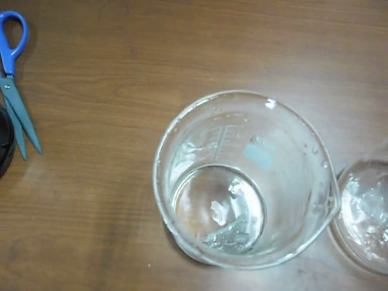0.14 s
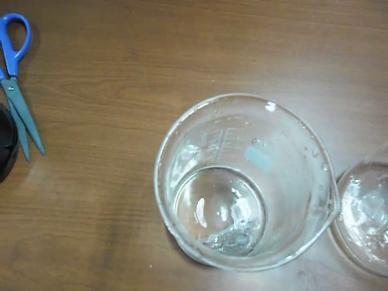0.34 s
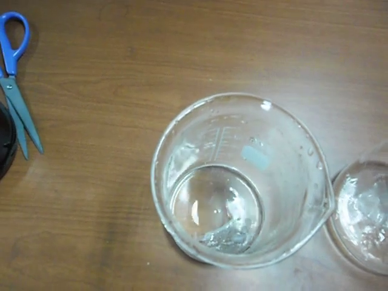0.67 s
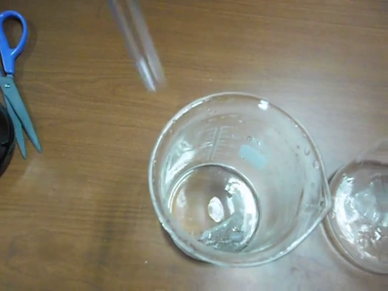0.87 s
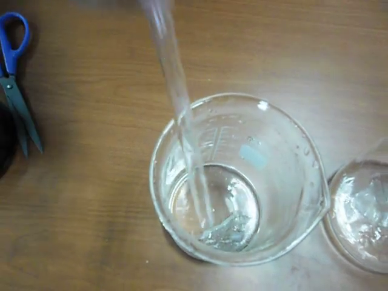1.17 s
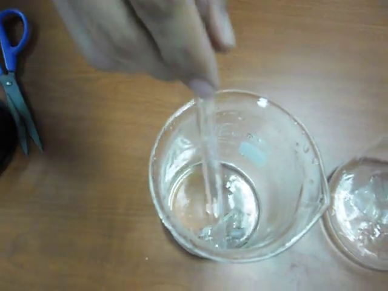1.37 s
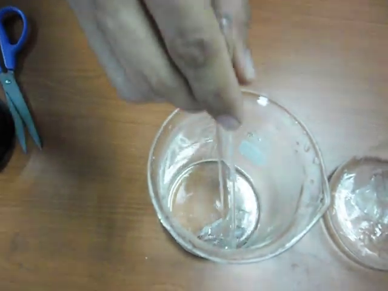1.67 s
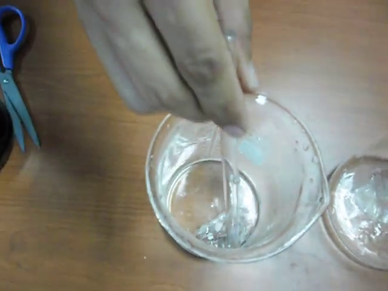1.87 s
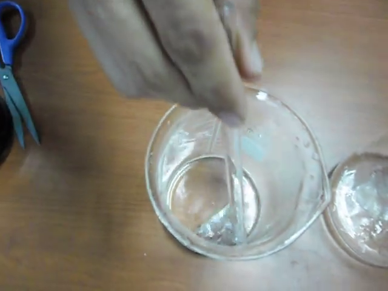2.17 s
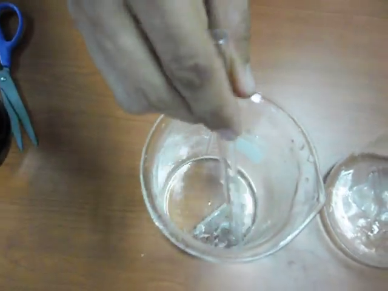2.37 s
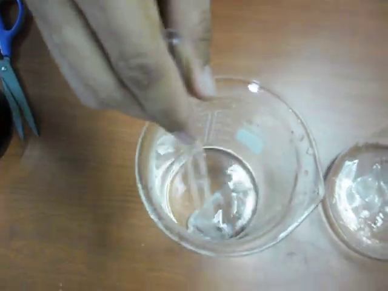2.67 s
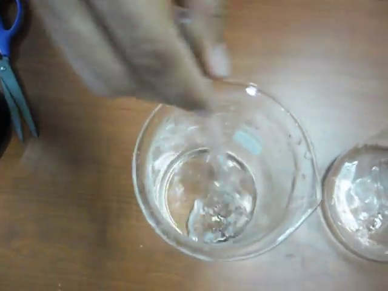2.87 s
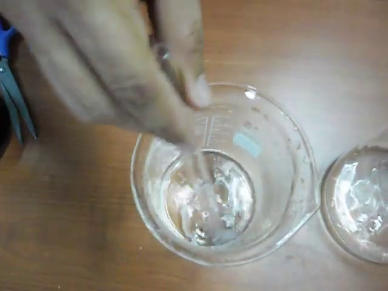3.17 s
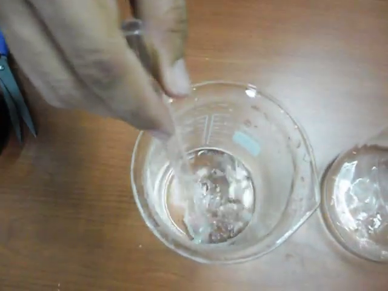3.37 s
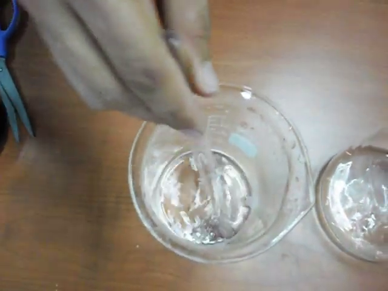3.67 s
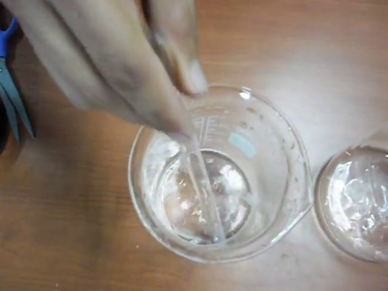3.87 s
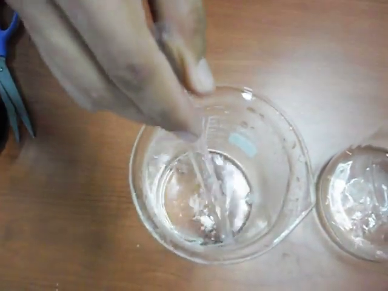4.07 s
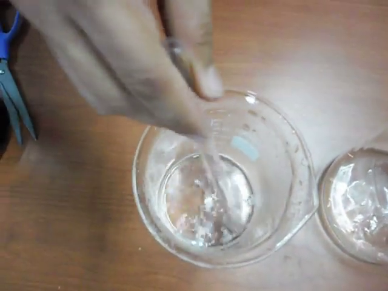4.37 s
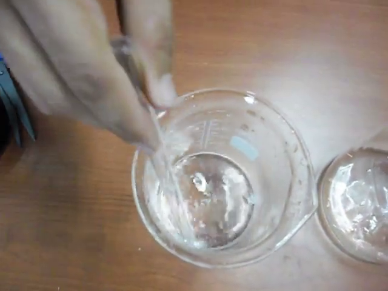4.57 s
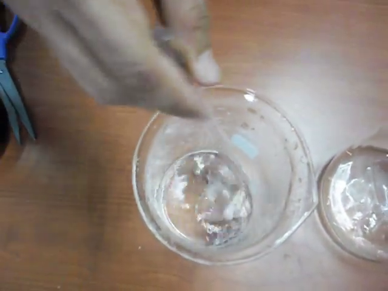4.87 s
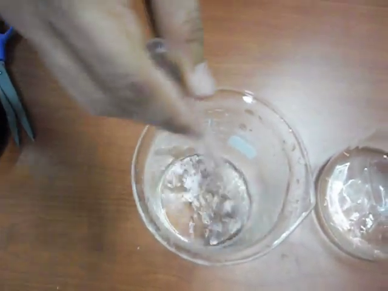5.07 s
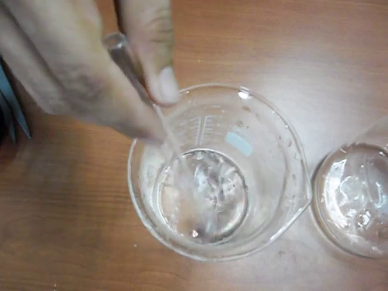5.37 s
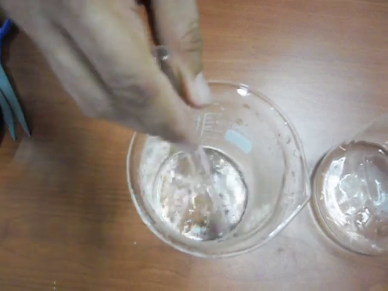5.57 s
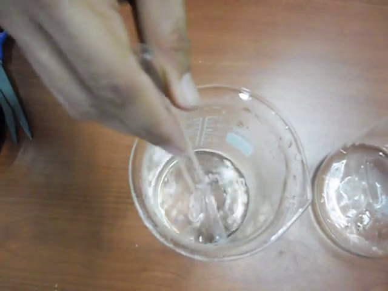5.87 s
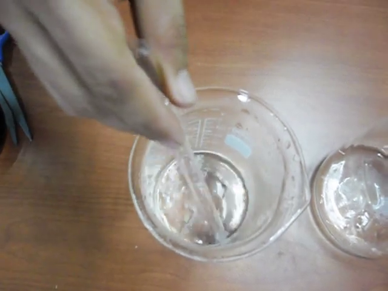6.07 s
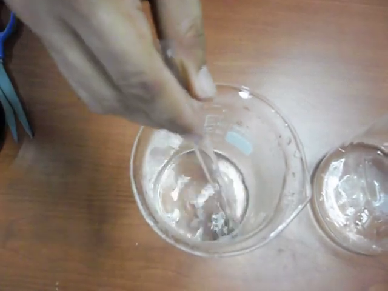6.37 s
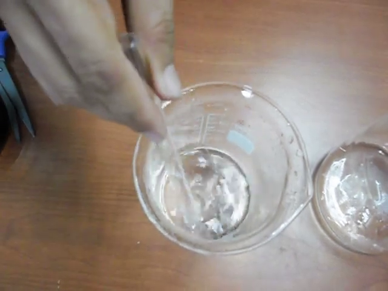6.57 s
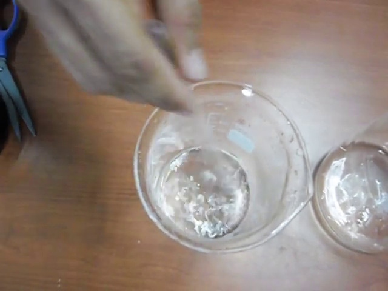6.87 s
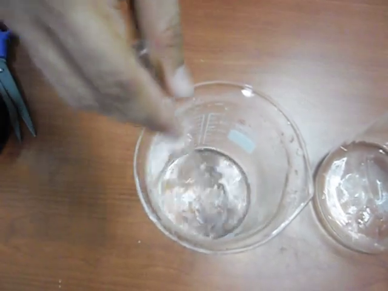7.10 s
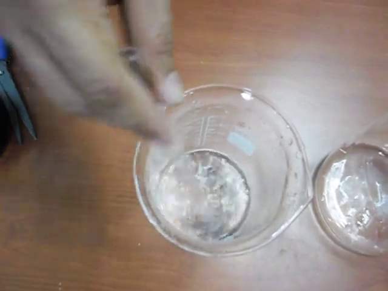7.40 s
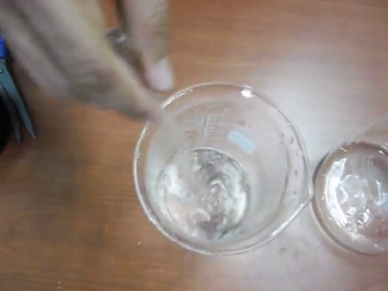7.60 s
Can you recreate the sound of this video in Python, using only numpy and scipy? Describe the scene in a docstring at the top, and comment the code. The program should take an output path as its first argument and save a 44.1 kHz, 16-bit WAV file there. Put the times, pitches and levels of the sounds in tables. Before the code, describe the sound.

Close glassy clinks and duller knocks of a stirring rod in a beaker, irregularly spaced, with light ticking skips near the end, over steady hiss.

```python
"""A low handling rumble under steady microphone hiss is heard first, then bright ringing clinks close by.
A glass rod stirs water in a glass beaker on a wooden table: it strikes the bottom and bounces, knocks
the wall more dully, and ticks as it skips. Blows are sums of decaying modes with a short noise snap;
ticks and touches are brief damped tones. A small room adds sparse reflections; the sound is mono."""
import sys
import numpy as np
from scipy import signal
from scipy.fft import rfft, irfft
from scipy.io import wavfile

SR = 44100
rng = np.random.default_rng(int(sys.argv[2]) if len(sys.argv) > 2 else 0)


def pcm_store(signal):
    """Save signal as 16-bit PCM."""
    levels = np.round(np.clip(np.atleast_2d(signal), -1, 1) * 32767)
    wavfile.write(sys.argv[1], SR, levels.astype(np.int16).T)


N = 341334  # length [samples]


def gain_of(db):
    """Level to amplitude: 20 dB is a factor of ten."""
    return 10 ** (np.asarray(db) / 20)


def add(mix, s, sound):
    """Superposition: pressures add, here from time s [s] onward."""
    part = mix[round(s * SR):][:len(sound)]
    part += sound[:len(part)]


def ring(hz, db, t60, t):
    """Modal superposition: each mode is a sine that decays exponentially by 60 dB in its t60 [s]."""
    envelopes = gain_of(db[:, None] - 60 * t / t60[:, None])
    sines = np.sin(2 * np.pi * hz[:, None] * t)
    return (envelopes * sines).sum(0)


def rise(t, seconds):
    """Exponential onset: a contact of finite duration builds up with this time constant."""
    return 1 - np.exp(-t / seconds)


def spectral_gain(x, gain):
    """Linear filtering: a gain for every frequency, without phase shift."""
    return irfft(rfft(x) * gain, N)


def shaped(points):
    """Coloured noise of rms 1: white noise is weighted by gains interpolated over log frequency."""
    f, db = np.transpose(points)
    hz = np.fft.rfftfreq(N, 1 / SR)
    curve_db = np.interp(np.log(hz + 1), np.log(f + 1), db)
    noise = spectral_gain(rng.standard_normal(N), gain_of(curve_db))
    return noise / np.sqrt(np.mean(noise ** 2) + 1e-20)


# Blows and bounces of the rod:
# (time [s], strength [dB], lift of the 2.7 kHz pair [dB], lift of the 3.7 kHz tone [dB],
#  spot [0 bottom to 1 wall, may go beyond], knock pitch [Hz], ring time [factor], contact [ms],
#  then relative to the strength: table thud [dB], clear 5 kHz tone [dB], 6.4 kHz shimmer [dB], snap [dB])
BLOWS = [(1.357, -21.5, 6, -2, 0.18, 2430, 0.88, 1, -44, -19, -11, -14),
         (1.3825, -34, 10, -3, 0.15, 2580, 0.96, 1.5, -44, -10, -9, -1),
         (1.401, -36.5, 2, -6, .4, 2600, 1, 4.1, -20, -4.5, -19, -11),
         (1.7819, -41, 3, 0, 1.23, 2440, 0.34, .91, -17, -27, -25, -8),
         (2.0177, -23.5, 1.5, -3, 0.034, 2480, 0.6, 3.1, -38, -5, -17, -11),
         (2.0224, -39, -4, -3, .1, 2420, .75, 1.2, -28, -23, -18, -11),
         (2.5665, -23.5, -8, -3, 0, 2500, 0.38, 0.78, -42, -10.5, -18, -13),
         (2.5824, -34, 5, 2, 0.14, 2480, .84, 1.4, -36, -10, -24, -27),
         (2.6023, -22, 0.5, 0.5, 0.94, 2370, .63, 0.44, -14.5, -27, -25, 0),
         (2.7759, -28, -4, 2, .8, 2510, 0.48, 1.3, -19.5, -26, -27, -3.5),
         (3.0069, -21.5, -2.5, 0, 0, 2330, 0.75, 1.7, -32.5, -12, -7, -6.5),
         (3.0174, -45, 0, 1, .1, 2550, .6, 1.2, -30, -14, -5, -14),
         (3.037, -30, -3, 0, 0, 2530, .9, 1.2, -34, -13, -8.5, 0.5),
         (3.0464, -36, 1, 3, .1, 2450, .9, 1.2, -44, -26, -15, 1),
         (3.0534, -39, 2, 2, 0, 2280, 1, 1.1, -23, -9, -11, 0),
         (3.1099, -31, 1, 3, 0.85, 2250, 0.69, .52, -14.5, -27, -17.5, -6),
         (3.371, -18.5, -0.5, 3, 0, 2400, .9, 0.5, -31, -13.5, -10, -7.5),
         (3.3851, -21, 5.5, 0, 0, 2390, .73, 3.7, -44, -6.5, -20, -9.5),
         (3.8909, -19.5, -3, 5.5, 0.85, 2250, 0.84, 1.9, -12, -27.5, -23.5, 1.5),
         (4.4989, -18.5, 0, 6, 0, 2520, 0.69, 2.1, -31.5, -8.5, -10, -8.5),
         (4.5064, -27.5, -2, -3, 0, 2550, 0.35, 1.5, -41, -21, 3.5, -10),
         (4.5174, -27, -10, 5, 0.084, 2500, 0.66, .71, -33, -32, -10, -8),
         (4.5666, -40.5, 1, 0, .2, 2500, .9, 1.3, -29, -11.5, -17, -17),
         (4.6783, -38, -2, -1, 0.92, 2460, 0.4, .88, -15, -27, -20, -12),
         (4.7372, -33, 3, -2, 0.86, 2190, 0.67, .89, -12, -31, -27, 0.5),
         (5.048, -26.5, 3, -4, .1, 2540, 0.84, 1.1, -43, -15, -14, -5.5),
         (5.0548, -35, -1, -8, 0.017, 2240, 0.91, 1.6, -24, -7.5, -30, -10),
         (5.124, -28.5, -1, -7, .9, 2130, 0.49, .48, -11.5, -30, -26, 5.5),
         (5.359, -15.5, -2.5, 4, 0, 2340, 0.97, 2.6, -34.5, -14, -8.5, -11),
         (5.3744, -24.5, -6, 0, .2, 2300, 0.7, .89, -32, -30, -25, 0.5),
         (5.5527, -35, 3, -3, 0.74, 2270, 0.54, 1.1, -10, -24, -16.5, 2),
         (5.9104, -36.5, -1, 11, 0.86, 2460, .69, 1.1, -14, -25, -17, -16),
         (6.5864, -28, 1.5, 0, 1.11, 2290, 0.78, .96, -18, -23, -16, -8),
         (6.6039, -24.5, 0, 1, 0.55, 2290, 1, 0.74, -17, -18, -28, -0.5),
         (6.9806, -17, -2, -2, 1.075, 2344, 0.52, 0.5, -23, -27.5, -23, -5),
         (7.2394, -22.5, 2, 7, 0.38, 2530, 0.3, 1.1, -46, -17, -27, -6.5),
         (7.2444, -27.5, 4.5, 5, 0.35, 2350, 0.84, .4, -20, -12, -13.5, -18),
         (7.272, -23.5, 0, -4, 1.19, 2530, 0.35, 0.45, -24, -29, -37, -13),
         (7.6623, -16.5, -2.5, -2, 0.97, 2370, 0.44, 0.73, -27, -27, -28, -3.5)]


def rod():
    """Impact excitation: every blow and bounce of the rod sets the beaker ringing anew."""
    out = np.zeros(N)
    chance = rng.standard_normal((len(BLOWS), 3, len(MODES) + 1))
    grit = rng.standard_normal((len(BLOWS), 1024))
    for row, blow_chance, blow_grit in zip(BLOWS, chance, grit):
        add(out, *blow(row, blow_chance, blow_grit))
    return out


# Modes of table and beaker: (frequency [Hz])
MODE_HZ = (587, 660, 760, 870, 1082, 1346, 1946, 2592, 2747, 3088, 3722, 4060, 4200, 4425, 4490, 4606, 4810,
           5050, 5102, 5490, 5908, 6030, 6210, 6336, 6417, 6615, 6710, 6805, 6966, 7095, 7670, 7815, 8130)
# Their decay, one row per mode: (quickly drained part [dB], free ring [dB], t60 of the free ring [s])
MODES = [(-3, -3.5, 0.063), (-0.5, -13.5, 0.21), (-13.5, -10.5, 0.1), (-11.5, -10, 0.078),
         (-16.5, -14.5, 0.12), (-15.5, -14, 0.076), (-30.5, -25.5, 0.7), (8.5, -16.5, 0.13), (-3, -12, 0.4),
         (-2.5, -10, 0.38), (-0.5, -4, 0.14), (-4.5, -9.5, 0.037), (3, -18, 0.034), (-3, -5.5, 0.051),
         (-8.5, -1.5, 0.04), (-14, -14, 0.22), (-8, -9, 0.058), (-9.5, -14.5, 0.059), (9, -8.5, 0.25),
         (-6.5, -3, 0.056), (-5, -6.5, 0.22), (6, -3.5, 0.14), (-1.5, -10, 0.11), (-3.5, -8, 0.19),
         (5.5, -4.5, 0.21), (-2.5, -7.5, 0.1), (0, -0.5, 0.11), (-4, -5.5, 0.28), (4, 1.5, 0.13),
         (-8.5, -11, 0.031), (0, -3.5, 0.026), (0.5, 2.5, 0.056), (13.5, 3.5, 0.029)]
# The damped low tone whose pitch shifts with the point of contact, same columns
KNOCK = (3.5, -4, 0.055)


def blow(row, chance, grit):
    """Modal excitation: the point of contact decides how strongly each family of modes answers."""
    (s, strength_db, pair_db, mid_db, spot, knock_hz, ring_time, contact_ms,
     thud_db, clear_db, shimmer_db, snap_db) = row
    family_db = families(spot, pair_db, mid_db, thud_db, clear_db, shimmer_db)
    level_chance, water_chance, twin_chance = chance
    t = np.arange(SR // 2) / SR

    family = np.append(np.searchsorted(FAMILY_TOPS, MODE_HZ), 1)  # the knock belongs to family 1
    is_table = family == 0
    # sloshing water detunes the glass
    hz = np.append(MODE_HZ, knock_hz) * (1 + .0004 * water_chance)
    # the spout splits each mode into a beating pair
    twin_hz = hz * (1 - .003 * (1 + .3 * twin_chance))

    drained_db, free_db, t60 = np.transpose(MODES + [KNOCK])
    spot_db = family_db[family] + 2.1 * level_chance  # every spot favours other modes
    t60 = t60 * np.where(is_table, 1, ring_time)  # the rod damps the glass but not the table
    # while the rod leans on the glass much of the ring drains fast; a part rings on freely
    parts = [(hz, drained_db, np.minimum(t60, .045)),
             (hz, free_db, t60),
             (twin_hz, free_db - 21, 3.5 * t60)]

    out = np.zeros(len(t))
    for modes, rise_ms in ((~is_table, contact_ms), (is_table, 3.5)):  # the table answers slowly
        tones = sum(ring(f[modes], (db + spot_db)[modes], decay[modes], t) for f, db, decay in parts)
        out += tones * rise(t, rise_ms / 1000)
    out += singing(family_db, ring_time, t)
    add(out, 0, snap(grit, snap_db))
    return s, gain_of(strength_db) * out


# Upper limits of the families of modes, the last family being open: (frequency [Hz])
FAMILY_TOPS = (1600, 2450, 2670, 2900, 3400, 3900, 4460, 4900, 5350, 5960, 6120, 6700, 7300)
# Answer of the other families, low to high, to a blow on the bottom: (level against the strength [dB])
ON_BOTTOM = (-34, -30, -28, -26, -24.5, -21, -22.5, -15.5, -17.5, -26, -14)
# The same for a blow on the wall
ON_WALL = (-10, -22, -27, -24.5, -21, -11, -15.5, -27, -25.5, -26, -28.5)


def families(spot, pair_db, mid_db, thud_db, clear_db, shimmer_db):
    """Modal participation: family levels blend from bottom to wall, the most telling set blow by blow."""
    blend_db = np.add(ON_BOTTOM, spot * np.subtract(ON_WALL, ON_BOTTOM))
    blend_db[[1, 2, 4]] += pair_db, pair_db, mid_db
    # thud, clear tone and shimmer become families 0, 8 and 11
    return np.insert(blend_db, [0, 7, 9], [thud_db, clear_db, shimmer_db])


# Tones that sing on faintly: (frequency [Hz], level against their family [dB], t60 [s])
SINGING = [(2590, -11.5, .4), (2750, -7.5, 0.74), (5093, -22.5, .5)]


def singing(family_db, ring_time, t):
    """Free vibration: three lightly damped tones sing on faintly when the rod leaves the glass free."""
    hz, db, t60 = np.transpose(SINGING)
    db = db + family_db[np.searchsorted(FAMILY_TOPS, hz)]
    muffled_db = 25 * max(.85 - ring_time, 0)  # a rod that stays in touch stifles them
    return ring(hz, db - muffled_db, t60, t) * rise(t, .004)


def snap(grit, snap_db):
    """Broadband transient: the contact is a noise burst above 1700 Hz with a t60 of 14 ms."""
    t = np.arange(len(grit)) / SR
    b, a = signal.butter(2, 1700 / (SR / 2), "high")
    return signal.lfilter(b, a, grit) * gain_of(snap_db - 60 * t / .014)


# The rod tip skipping lightly: (time [s], level [dB], pitch [Hz])
TICKS = [(3.1949, -40.5, 2480), (3.2246, -44, 2200), (4.6364, -50, 2720), (6.7565, -50, 2480),
         (6.813, -40, 2480), (6.8663, -49, 2740), (7.0464, -49, 2460), (7.0823, -43.5, 2400),
         (7.0928, -43, 2500), (7.128, -37.5, 2430), (7.1586, -38.5, 2330), (7.415, -45, 2480),
         (7.4379, -38.5, 2410), (7.5186, -48, 2570), (7.5532, -42.5, 2900), (7.5742, -43.5, 2630),
         (7.7243, -44, 2540)]


def ticks():
    """Weak excitation: a light touch wakes only the damped knock and a softer tone at 4400 Hz."""
    upper_db, t60_s, rise_s = -13, 0.02, 0.00054
    out, t = np.zeros(N), np.arange(3000) / SR
    for s, db, hz in TICKS:
        tone = ring(np.array([hz, 4400.]), np.array([db, db + upper_db]), np.array([t60_s] * 2), t)
        add(out, s, tone * rise(t, rise_s))
    return out


# Spells of fainter touches as the tip skates: (start [s], end [s], rate [1/s], lowest level [dB])
SKATE = [(6.993, 7.746, 34, -63)]


def skate():
    """Random point process: tiny touches at chance times, each a short knock of its own pitch."""
    out, t = np.zeros(N), np.arange(1200) / SR
    for start, end, per_s, lowest_db in SKATE:
        span = end - start
        for when, pitch, size in rng.random((round(per_s * span), 3)):
            hz = 2150 + 600 * pitch
            envelope = gain_of(lowest_db + 10 * size - 60 * t / 0.023)
            add(out, start + when * span, envelope * np.sin(2 * np.pi * hz * t))
    return out


def room(x):
    """Reverberation: sparse reflections of random sign die fast in a small furnished room."""
    t60_s, spacing = .2, 20  # one reflection in every 20 samples
    taps = np.zeros(SR // 2)
    at = np.arange(200, len(taps) - spacing, spacing)
    taps[at + rng.integers(0, spacing, len(at))] = rng.choice([-1., 1.], len(at))
    taps *= gain_of(-60 * np.arange(len(taps)) / SR / t60_s)
    return signal.fftconvolve(x, taps / np.linalg.norm(taps))[:N]


# Handling of the microphone at first: (time [s], level [dB])
RUMBLE = [(0.0, -64), (0.07, -63), (0.136, -57), (0.334, -70), (0.448, -79), (0.49, -70), (0.6, -69)]


def rumble():
    """Structure-borne noise: handling gives low-frequency noise under a slowly varying envelope."""
    s, db = np.transpose(RUMBLE)
    envelope = gain_of(np.interp(np.arange(N) / SR, s, db, right=-120))
    # spectrum: (frequency [Hz], relative density [dB])
    return envelope * shaped([(10, -4), (22, 12.5), (40, 9.5), (70, -38)])


# Spectrum of the microphone hiss: (frequency [Hz], relative density [dB])
HISS = [(12, -28), (20, -0.5), (84, -2), (152, 0), (303, -2.5), (469, -4.5), (891, -6.5), (1780, -9.5),
        (5510, -13), (9000, -17.5)]


def hiss():
    """Stationary noise: coloured noise at -55 dB rms falls off towards the treble."""
    return gain_of(-55) * shaped(HISS)


def scene():
    """Superposition of glass, its reflections, hiss and a little rumble, alike in both channels."""
    glass = rod() + ticks() + skate()
    handling = rumble()
    glass += gain_of(-15) * room(glass)
    mono = glass + hiss() + handling
    return np.array([mono, mono])


# Treble loss of the microphone: (frequency [Hz], gain [dB])
MIC = [(7000, 0), (7500, 0), (8000, -14), (8650, -16.5), (9340, -52), (9800, -46)]


def record(dry):
    """Transducer response: treble loss, then a band limit at 9500 Hz, over a trace of converter noise."""
    f, db = np.transpose(MIC)
    loss_db = np.interp(np.fft.rfftfreq(N, 1 / SR), f, db)
    dull = spectral_gain(dry, gain_of(loss_db))
    low_pass = signal.firwin(511, 9500, window=("kaiser", 9), fs=SR)
    cut = signal.oaconvolve(dull, low_pass[None], "same")
    return cut + gain_of(-103) * rng.standard_normal(N)


dry = scene()
out = record(dry)
pcm_store(out)
```